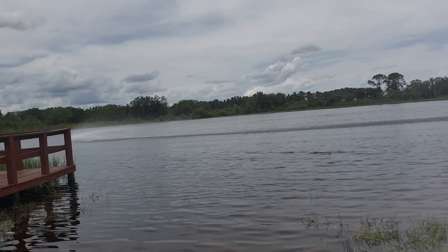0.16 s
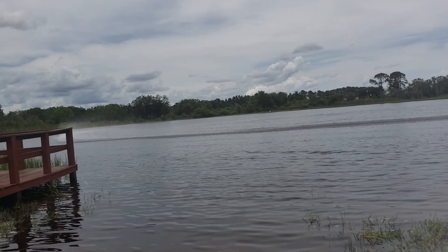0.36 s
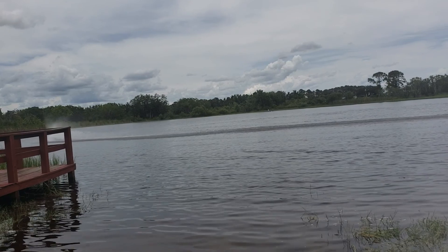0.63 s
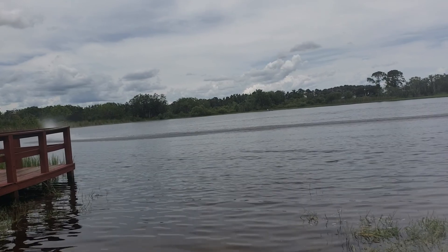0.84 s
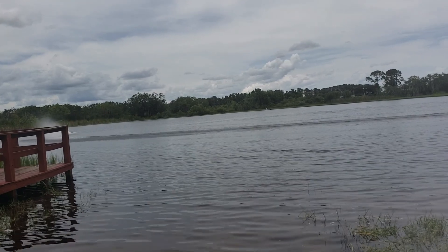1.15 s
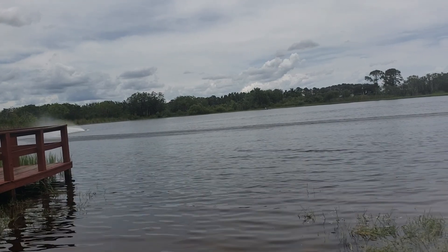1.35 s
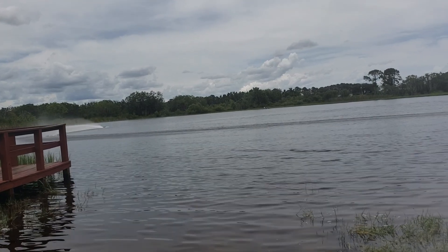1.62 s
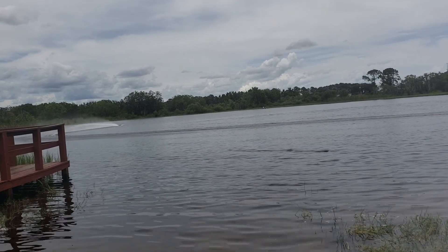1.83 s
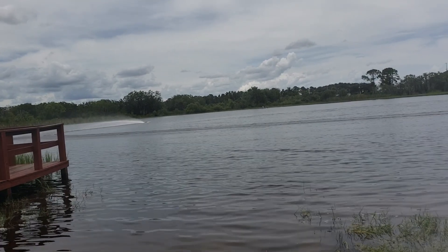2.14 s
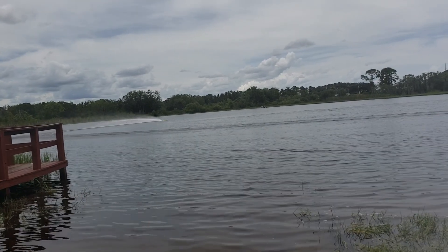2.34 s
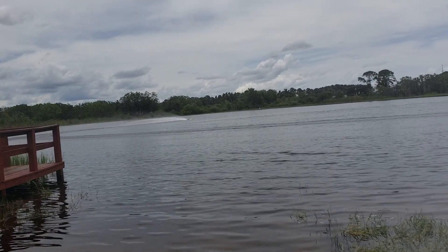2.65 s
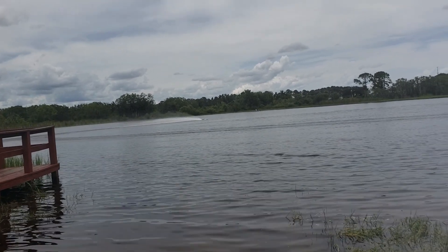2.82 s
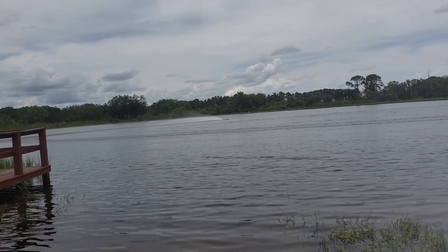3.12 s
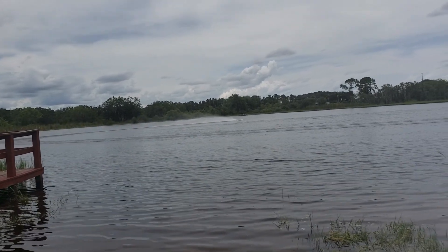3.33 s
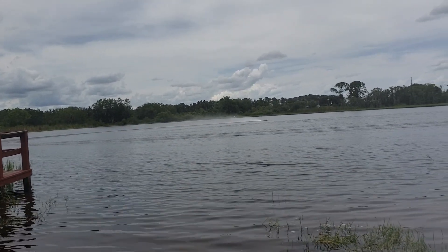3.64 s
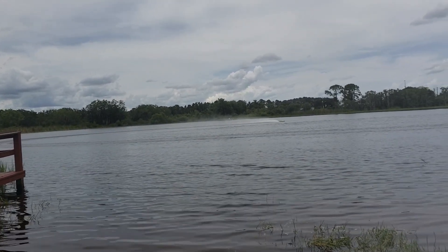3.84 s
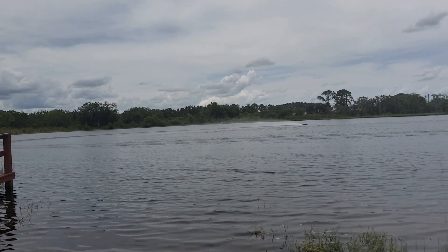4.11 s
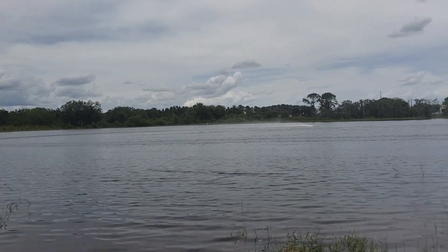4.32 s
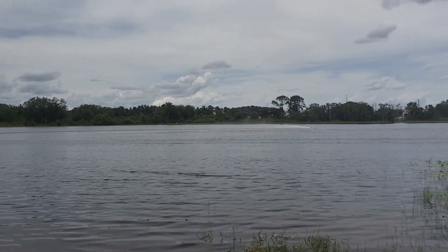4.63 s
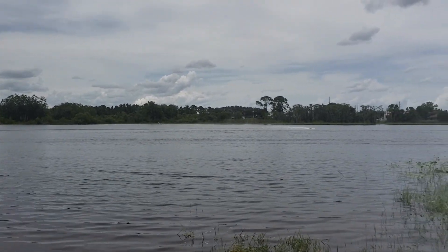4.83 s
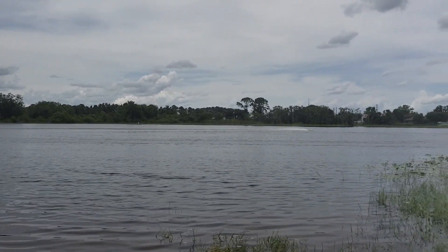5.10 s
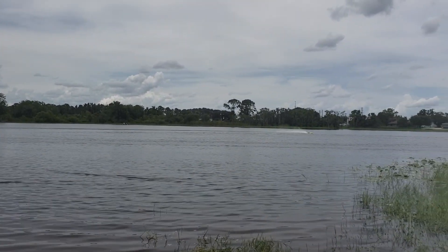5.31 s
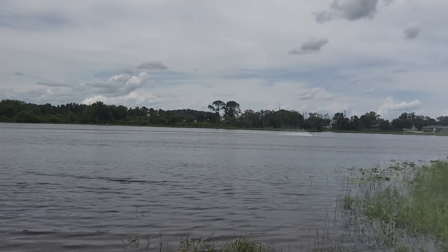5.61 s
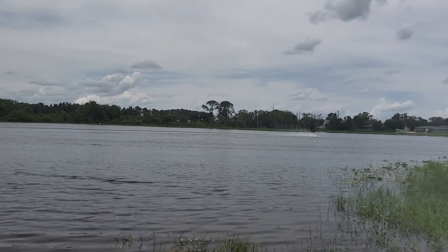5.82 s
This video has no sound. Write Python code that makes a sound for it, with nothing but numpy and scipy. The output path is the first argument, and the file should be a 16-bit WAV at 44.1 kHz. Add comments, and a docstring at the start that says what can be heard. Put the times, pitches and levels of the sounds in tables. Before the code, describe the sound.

Outdoors by a lake, a distant model boat with a small two-stroke engine whines high and steady, its tone shifting as it turns and passes behind a wooden jetty. Spray and light breeze hiss underneath. Hull slaps come midway, then after about four and a half seconds the pitch falls in steps, sputtering, and steadies lower. Stereo microphone on the shore, engine far off.

```python
"""Model boat on a lake

A small two-stroke model boat races across a lake, far from two microphone ports; a breeze blows.
Each firing is a sharp pulse, built from overtones of the firing rate and bursts of gas noise.
Overtones swell and fade as the hull turns, passes behind a jetty and throttles back.
Spray is filtered noise, wave slaps are short thumps with a splash, a distant motor is one climbing
tone, and an insect in the reeds ticks on two high tones."""
import sys
import numpy as np
from scipy import signal
from scipy.fft import rfft, irfft, next_fast_len
from scipy.io import wavfile
from scipy.ndimage import uniform_filter1d, map_coordinates

SR = 44100
rng = np.random.default_rng(int(sys.argv[2]) if len(sys.argv) > 2 else 0)


def pcm_store(signal):
    """Save signal as 16-bit PCM."""
    levels = np.round(np.clip(np.atleast_2d(signal), -1, 1) * 32767)
    wavfile.write(sys.argv[1], SR, levels.astype(np.int16).T)


N = 262836  # length in samples
TOP_HZ = 15830  # nothing is heard above this
PIPE_LAG = 1.1  # lag in radians far below the pipe's resonance
HALVES = np.array([[.5], [-.5]])  # shares a left-right difference between the ports

# Water and air before their random surges: start_s, spray_db, breeze_db
WASH = [(0, -42, -46), (.5, -48.5, -45), (1.1, -58, -44), (1.6, -46.5, -44), (2.1, -45, -42.5),
        (2.7, -44.5, -43.5), (3, -41, -38), (3.6, -40, -41), (4.3, -44, -40.5), (4.6, -41, -39.5),
        (4.9, -49, -43), (5.3, -47, -41.5), (5.45, -45, -41.5), (5.96, -52, -40.5)]
# Single overtones swell or fade for a moment: order (multiple of the firing rate), middle_s,
# change_db, half_length_s
SWELLS = [(12, 0.043, 15, .1), (10, .04, 3.5, .09), (10, .15, -8, .02), (10, 0.21, 3.5, .03),
          (13, .04, 5, .08), (14, .04, -9, .08), (16, .08, 13, .15), (7, 0.79, -9, .07), (5, .8, 6, 0.066),
          (13, 1.25, 9, 0.088), (14, 4.42, 10, .07), (7, 0.98, -10, .03), (8, 0.8, -10, .02),
          (8, 0.88, 6, .05), (8, .97, -8, 0.023), (10, 0.89, -8, .05), (7, 1.1, -8, .02),
          (4, 1.35, -8, .02), (10, 1.04, 9, 0.048), (8, 1.09, 7.5, 0.088), (3, 1.29, 4.5, 0.05),
          (3, 4.1, 3, 0.03), (3, 4.07, 5.5, 0.017), (3, 4.31, 7.5, .016), (4, 4.31, 5, .02),
          (3, 4.43, 2, 0.018), (4, 3.8, 6, .012), (13, 4.42, -7, .06), (7, 0.46, 5, 0.17),
          (3, 1.18, -12, 0.037), (4, 1.08, -6, 0.1), (8, 1.47, 11.5, 0.22), (6, 1.61, -11.5, 0.18),
          (6, 2.08, 3, 0.15), (6, 2.22, -4, 0.063), (9, 2.4, 5.5, 0.087), (4, 2.64, -4, 0.098),
          (8, 2.93, -5.5, 0.26), (5, 3.05, 2, 0.05), (4, 3.27, -9, 0.25), (4, 3.5, 3.5, 0.3),
          (5, 4.08, -11, 0.074), (3, 4.2, -9, 0.042), (5, 4.42, 10, 0.12), (5, 4.6, 4, 0.067),
          (4, 4.7, 7, 0.097), (13, 4.53, -6, 0.03), (7, 4.65, 9.5, 0.18), (12, 4.95, 6.5, 0.077),
          (13, 1.9, 2, 0.47), (8, 4.57, 11, 0.046), (10, 4.57, -16, 0.038), (11, 4.58, 6.5, 0.046),
          (10, 5.8, 2, 0.041), (11, 4.82, 8, 0.057), (5, 4.8, 10, 0.039), (12, 4.81, -15, 0.039),
          (11, 0.99, 12, .25), (14, 1.97, -9, 0.69), (15, 1, 3.5, 1), (16, 1.4, -6, 0.25),
          (15, 2.25, -6, .25), (16, 2.3, 8, .35), (17, 2.2, 9, 0.52), (16, 4.2, -10, .25),
          (15, 4.57, 11, 0.062), (16, 5.4, 5, 0.058), (15, 5.1, 4, .06), (17, 4.69, 10, .06),
          (6, 5.48, 4, 0.14), (12, 5.56, 5.5, 0.17), (8, 5.68, 2.5, 0.22), (5, 5.85, 11.5, 0.18),
          (4, 5.95, 7, 0.067)]


def amp(db):
    """Turn decibels into a plain factor."""
    return 10 ** (np.asarray(db) / 20)


def unit(x):
    """Scale a sound to rms 1."""
    return x / np.sqrt(np.mean(x ** 2) + 1e-20)


def along(points, hz):
    """Read a curve of (Hz, value) points on a log frequency axis."""
    f, v = np.transpose(points)
    return np.interp(np.log(hz + 1), np.log(f + 1), v)


def curves(rows):
    """One value per sample for each column after the time."""
    s, *cols = np.transpose(rows)
    return [np.interp(np.arange(N) / SR, s, c) for c in cols]


def bumps(rows):
    """A sum of smooth bumps: middle in s, height, half length in s."""
    return sum(height * np.exp(-((np.arange(N) / SR - s) / half) ** 2) for s, height, half in rows)


def swells_of(swells, k):
    """The level change in dB of overtone k."""
    return bumps([row for order, *row in swells if round(order) == k])


def wobble(rate):
    """A random curve of straight pieces, with rate knots a second."""
    knots = rng.standard_normal(int(N * rate / SR) + 4)
    return np.interp(np.arange(N) * rate / SR, np.arange(len(knots)), knots)


def filtered(x, response):
    """Shape x by a response, possibly complex, at each frequency."""
    m = next_fast_len(N + 8192)
    return irfft(rfft(x, m) * response(np.fft.rfftfreq(m, 1 / SR)), m)[..., :N]


def hiss(spectrum, alike):
    """Stereo noise of rms 1; alike sets how similar left and right are at each frequency."""
    def response(hz):
        turn = np.arccos(np.clip(along(alike, hz), -1, 1)) / 2
        return amp(along(spectrum, hz)) * [np.cos(turn), np.sin(turn)]

    mid, side = filtered(rng.standard_normal((2, N)), response)
    return unit(np.array([mid + side, mid - side]))


def from_boat(spectrum, lead_ms, alike):
    """Noise from the boat that reaches one port before the other."""
    pair = hiss(spectrum, alike)
    at = np.arange(N) + lead_ms / 1000 * SR * HALVES
    return np.array([map_coordinates(x, [i], mode="nearest") for x, i in zip(pair, at)])


def overtones(turns, rate, spectrum, orders, spread, fade_db, fade_rate, lift_db=np.zeros(N),
              lift_hz=4100, over_hz=0, swells=(), lag=0):
    """Some orders of a pulse train, each fading and drifting alone; rms 1 above over_hz before swells."""
    out, power = np.zeros((2, N)), 1e-12
    for k in orders:
        hz = k * rate[::64]  # levels are updated every 64 samples
        lift = lift_db[::64] * np.clip((hz - lift_hz) / 700, 0, 1)
        gain = amp(along(spectrum, hz) + fade_db * wobble(fade_rate)[::64] + lift) * (hz < TOP_HZ)
        power = power + gain ** 2 / 2 * np.clip((hz - over_hz) / 200, 0, 1)
        tone = np.sin(2 * np.pi * k * turns - lag + spread * wobble(fade_rate))
        out -= amp(swells_of(swells, k)) * np.repeat(gain, 64)[:N] * tone
    return out / np.repeat(np.sqrt(power), 64)[:N]


def shaft(lead_ms, scatter_db):
    """The engine fires once a turn; its turns are counted as each port hears them."""
    # Firing rate before skips and hunting: start_s, rate_hz
    firing = [(0, 272.5), (.17, 268.2), (.46, 262.8), (1.3, 262.1), (2.38, 267.1), (3, 272.4), (3.2, 269.9),
              (3.46, 266.6), (3.61, 267.3), (3.77, 270.6), (4.1, 279.5), (4.26, 272), (4.4, 267.1),
              (4.507, 264.7), (4.52, 251), (4.55, 241.8), (4.62, 238.5), (4.65, 219.4), (4.756, 219.4),
              (4.79, 200.6), (4.848, 198.5), (4.886, 185.3), (5.03, 175.8), (5.22, 183), (5.32, 174.7),
              (5.4, 194.7), (5.49, 198.1), (5.96, 195.9)]
    # The propeller skips out of a wave and the engine races for a moment: middle_s, rise_hz
    skips = [(3.531, 5.55), (3.674, 5.2), (3.881, 3.1), (4.32, 9), (4.467, 8.35), (4.721, 4.07),
             (5.71, 3.4), (5.847, 5.5)]
    skip_half_s = .03
    steady_rate = curves(firing)[0] + bumps([(s, hz, skip_half_s) for s, hz in skips])
    # uneven firing makes the speed hunt
    rate = steady_rate * (1 + 0.001 * scatter_db ** 2 * wobble(30))
    turns = np.cumsum(rate) / SR + rate * lead_ms / 1000 * HALVES
    return steady_rate, rate, turns


def firings(turns, scatter_db):
    """Every combustion has its own strength, and some misfire."""
    # Missed firings: middle_s, dip_db, half_length_s
    stumbles = [(4.517, -5, 0.007), (4.552, -7, 0.008), (4.643, -4.5, 0.01), (4.785, -3, .008),
                (4.862, -5, 0.0079), (4.925, -7, .006)]
    # Four-stroking, every second firing fails; dips before alternation: middle_s, dip_db, half_length_s
    four_stroking = [(4.8, -6, .012), (4.935, -6, .01), (5.014, -16, .018), (5.085, -14, .022),
                     (5.24, -14, .012), (5.265, -8, .008), (5.296, -14, .018), (5.342, -12, .007)]
    strengths = rng.standard_normal((2, 2000))
    # a strong firing leaves a poor charge for the next
    strengths = np.clip(strengths - .75 * np.roll(strengths, 1, axis=1), -3, 1.1)
    push, snap = (map_coordinates(row, [turns[0] + 1], order=1) for row in strengths)
    # the firing after a miss is the stronger
    alternation = (.7 - np.cos(np.pi * turns)) / 2
    miss_db = bumps(stumbles) + bumps(four_stroking) * alternation
    return scatter_db * push, miss_db, snap


def order_levels(rate):
    """The colour turns with the hull and changes when the engine falls off the pipe or labours."""
    # Course of the hull: start_s, level_db, dulling_db_per_octave, heading (0-2; more counts as 2)
    hull = [(0, 0.5, -0.5, 0.18), (.3, -2, -2, 0.39), (.65, 0.5, 0.4, 0.28), (.9, 3, 4, 0.46),
            (1.12, -1, 2.5, 0.71), (1.3, -0.5, 2.5, 0.91), (1.45, -0.5, 0.7, 1.15), (1.7, 2.5, -0.26, 0.77),
            (1.95, 2.9, -0.23, .6), (2.3, 0.7, -0.27, 0.65), (2.55, 2, 0.4, 1.11), (2.8, 4.5, 2, 1.24),
            (3.05, 3, -0.87, 1.48), (3.4, 2, -1.84, 1.87), (3.6, 2.5, -1.5, 1.66), (3.9, 1.9, -1.04, 1.66),
            (4.15, 0.8, -0.76, 1.6), (4.45, 1.5, -0.35, 1.95), (4.65, 4, 2, 2.8), (4.8, 3, 3, 1.9),
            (4.92, -1, 1.5, 2.2), (5.05, 0, 1.5, 2), (5.2, 1.5, 1.3, 1.9), (5.45, 2.5, 1.43, 1.9),
            (5.96, 7, 3, 2)]
    # Strong orders on the pipe for three headings: order (multiple), first_db, second_db, third_db
    on_pipe = [(1, -36, -32.5, -33.5), (2, -39, -37, -53), (3, -40.5, -32, -38), (4, -21, -32, -41),
               (5, -37.5, -39, -43.5), (6, -38.5, -31, -36), (7, -38.5, -35, -50.5), (8, -35.5, -37.5, -40),
               (9, -54, -37, -47), (10, -38.5, -32.5, -46), (11, -51, -50, -47.5),
               (12, -44.5, -54.5, -48.5), (13, -49, -40, -44)]
    # Their colour once the engine has fallen off the pipe: pitch_hz, level_db
    off_pipe = [(180, -54), (240, -38), (390, -42), (480, -52.5), (600, -78), (780, -44.5), (900, -43.5),
                (1000, -46.5), (1200, -41), (1400, -46), (1600, -36), (1900, -46.5), (2200, -39.5),
                (2700, -42), (3200, -59)]
    # Their colour at the lowest speed: pitch_hz, level_db
    labouring = [(180, -53.5), (360, -43), (560, -60), (750, -48.5), (1050, -41.5), (1350, -40),
                 (1800, -40), (1970, -53), (2170, -39), (2400, -45)]
    on_pipe_hz, off_pipe_hz, labours_hz = 254, 243, 186  # firing rates
    level_db, dull_db, heading = curves(hull)
    off = np.clip((on_pipe_hz - rate) / (on_pipe_hz - off_pipe_hz), 0, 1)
    labour = np.clip((labours_hz - rate) / 5 + 1, 0, 1)
    for k, *by_heading in on_pipe:
        k = round(k)
        on_db = np.interp(heading, range(3), by_heading)
        off_db = (1 - labour) * along(off_pipe, k * rate) + labour * along(labouring, k * rate)
        colour_db = (1 - off) * on_db + off * off_db
        yield k, colour_db + level_db - dull_db * np.log2(k) + swells_of(SWELLS, k)


def low_orders(steady_rate, rate, turns, scatter, miss_db, spread, rings):
    """The strongest overtones of the pulses; the pipe evens out the lowest orders."""
    rasp_db, rasp_rad = 1.5, .42  # quick flutter of level and phase
    jetty_s, jetty_half_s, jetty_db = 1.15, .3, 2.5
    pipe_hz, pipe_width_hz = 1500, 380
    # the posts make each order flicker more as the boat passes behind
    flicker_db = 0.92 + bumps([(jetty_s, jetty_db, jetty_half_s)])
    out = np.zeros((2, N))
    for k, db in order_levels(steady_rate):
        uneven = min(k / 7, 1)
        change_db = scatter + miss_db + flicker_db * wobble(16) + rasp_db * wobble(45)
        # every order wavers a little on its way across the lake
        level = amp(db + uneven * change_db + .8 * wobble(21.97))
        pipe_lag = PIPE_LAG + np.pi / 2 + np.arctan((k * rate - pipe_hz) / pipe_width_hz)
        phase = 2 * np.pi * k * turns + 3 / k ** 2 - rings * pipe_lag
        drift = spread * wobble(3.628) + uneven * rasp_rad * (1 - rings) * wobble(60)
        out -= np.sqrt(2) * level * np.sin(phase + drift)
    return out


def exhaust_bark(turns, rate, spread, rings):
    """The tuned exhaust pipe colours the middle overtones."""
    # Tuned pipe: pitch_hz, relative_level_db
    pipe_colour = [(1800, -2.5), (2400, -2), (2750, 4.5), (3060, -17), (3400, -3), (3620, -1), (3800, -7),
                   (4200, -11), (4500, -17), (4850, -18.5), (5200, -13.5), (5800, -53)]
    # The pipe's top resonance turns towards the shore: start_s, lift_db
    ring_lift = [(0, 2.5), (.9, -19), (2, -11), (2.6, 7.5), (3.4, 0), (4.4, 11.5), (5.1, -6), (5.96, 10)]
    return overtones(turns, rate, pipe_colour, range(14, 32), spread, fade_db=2.2, fade_rate=20,
                     lift_db=curves(ring_lift)[0], over_hz=2750, swells=SWELLS,
                     lag=(PIPE_LAG + np.pi) * rings)


def outlet_crack(turns, rate, spread, lead_ms, gate):
    """The edge of the outlet gives sharp high overtones and a puff of gas noise at each firing."""
    # Outlet edge: pitch_hz, relative_level_db
    edge_colour = [(4600, -83), (5600, -8.5), (6800, -7), (7900, 1), (9300, -6), (11200, -6.5),
                   (12000, -27), (13000, -33), (16000, -48)]
    # Lift of the crack's upper band: start_s, lift_db
    edge_top = [(0, 3), (.6, -4), (1, -12), (1.33, 10), (1.5, 4), (2.1, -2), (2.5, 2), (3, -4), (3.55, 4.5),
                (3.8, 0.5), (4.2, 1.5), (5, -5), (5.3, -4), (5.4, 2), (5.96, -3)]
    tones = overtones(turns, rate, edge_colour, range(20, 68), .6 + .25 * spread, fade_db=2.5,
                      fade_rate=10, lift_db=curves(edge_top)[0], lift_hz=9200)
    puffs = unit(gate * from_boat(edge_colour, lead_ms, [(5000, 0.16)]))
    noise_share = .07  # of the power
    return np.sqrt(1 - noise_share) * tones + np.sqrt(noise_share) * puffs


def jet_sizzle(turns, rate, lead_ms, gate):
    """The top of the exhaust jet: pulsing, flickering noise mixed with the highest overtones."""
    # Top of the exhaust jet: pitch_hz, relative_level_db
    jet_colour = [(9000, -17), (11800, -0.5), (13000, 3), (15000, -0.5), (16000, -21)]
    noise = from_boat(jet_colour, lead_ms, [(5000, 0.067)])
    noise = unit((1.0 + gate) * amp(2.5 * wobble(51)) * noise)
    tones = overtones(turns, rate, jet_colour, range(42, 88), 1.1, fade_db=3, fade_rate=20)
    return .75 * noise + .65 * tones


def spray(lead_ms, gate):
    """Hissing water that thickens with each push of the propeller."""
    # Colour of the spray: pitch_hz, relative_level_db
    spray_colour = [(100, -51), (250, 3.5), (420, -21), (640, -8), (900, 0), (1400, -5.5), (2200, -2),
                    (2700, -2), (3200, -7), (4000, -16), (5000, -29), (8000, -23), (16000, -42)]
    surge_db = 1.2 * wobble(12)
    water = from_boat(spray_colour, lead_ms, [(300, 0.99), (1500, 0.52), (4000, 0.11)])
    return amp(curves(WASH)[0] + surge_db) * water * (.9 + .7 * gate)


def boat():
    """Engine pulses and spray share the turns of one shaft and the bearing of one hull."""
    # Bearing of the boat: start_s, left_port_leads_ms, left_minus_right_db
    bearing = [(0, .06, -.9), (.5, .095, -.9), (.95, .12, -.3), (1.35, .1, -.5), (1.75, .08, -.5),
               (2.15, .055, 0), (2.55, .033, 0), (2.95, 0, .2), (3.35, -.03, .3), (3.75, -.057, .4),
               (4.15, -.085, .3), (4.55, -.11, .4), (5.35, -.12, .7), (5.96, -.15, .5)]
    # Combustion: start_s, firing_scatter_db (per unit of strength), pulse_spread_radians
    burn = [(0, 1.2, .8), (.4, 1, 1.2), (1.1, 1.1, 1.6), (2.6, .9, 1.2), (3.05, 1.1, .65), (4.3, 1.2, .7),
            (4.6, 1.8, .5), (4.9, 2.1, .25), (5, 1.5, .2), (5.33, 1.6, .2), (5.42, 1.6, .7),
            (5.96, 1.5, .8)]
    # Exhaust outlet facing the shore; bark is later smoothed and cut by 6 dB:
    # start_s, bark_db, crack_db, sizzle_db
    outlet = [(0, -29, -28, -28), (.2, -39, -44.5, -46), (.4, -32, -48.5, -57), (.81, -42.5, -58.5, -61),
              (1.23, -36, -49, -55), (1.33, -33, -38, -48), (1.49, -37, -40, -55),
              (1.59, -29, -37.5, -40.5), (1.66, -38, -39.5, -46), (1.76, -34, -35, -38),
              (1.87, -40, -43.5, -46), (2.07, -26, -38, -44), (2.12, -36, -42.5, -48),
              (2.17, -39, -38.5, -49), (2.22, -35, -41.5, -45), (2.51, -30, -37.5, -47),
              (2.6, -39, -53, -50.5), (2.89, -36, -55.5, -51), (2.99, -34, -39, -47), (3.04, -32, -43, -48),
              (3.14, -28.5, -36, -43), (3.24, -33, -41.5, -53), (3.4, -30, -44, -58),
              (3.49, -31.5, -35, -48), (3.53, -27, -38, -52), (3.57, -31.5, -33.5, -46),
              (3.7, -35, -42, -56), (3.79, -33.5, -35.5, -52), (3.9, -39, -41.5, -56), (4.1, -41, -38, -47),
              (4.32, -41.5, -41, -51), (4.55, -45, -50, -68), (4.675, -38, -40.5, -56),
              (4.72, -43, -47.5, -66), (4.91, -52, -60.5, -65), (5.06, -41.5, -45.5, -59),
              (5.54, -37.5, -49, -61), (5.75, -39, -52.5, -62), (5.96, -38, -47, -55)]
    # Off the throttle each pulse starts sharply and the pipe rings after it: start_s, share (0-1)
    ringing = [(4.35, 0), (4.48, .6), (4.9, .85), (5.4, .85), (5.5, .4)]
    lead_ms, pan_db = curves(bearing)
    scatter_db, spread = curves(burn)
    bark_db, crack_db, sizzle_db = curves(outlet)
    rings = curves(ringing)[0]
    steady_rate, rate, turns = shaft(lead_ms, scatter_db)
    scatter, miss_db, snap = firings(turns, scatter_db)
    gate = ((1 + np.cos(2 * np.pi * turns)) / 2) ** 3  # opens once a firing

    low = low_orders(steady_rate, rate, turns, scatter, miss_db, spread, rings)
    bark_db = uniform_filter1d(bark_db, size=2200) - 6.0
    bark = amp(scatter + miss_db + bark_db) * exhaust_bark(turns, rate, spread, rings)
    crack = amp(crack_db) * outlet_crack(turns, rate, spread, lead_ms, gate)
    sizzle = amp(sizzle_db) * jet_sizzle(turns, rate, lead_ms, gate)
    treble = amp(scatter + miss_db + 0.71 * snap + 1.86 * wobble(14)) * (crack + sizzle)
    return (low + bark + treble + spray(lead_ms, gate)) * amp(pan_db * HALVES)


def breeze():
    """Breeze and far traffic: soft noise with a slowly wavering level."""
    # Colour of the air: pitch_hz, relative_level_db
    air_colour = [(20, -26), (50, -9), (110, -2), (200, -6), (400, -8.5), (630, -14), (1000, -11),
                  (3000, -18.5), (5500, -30), (12000, -31.5), (16000, -46)]
    # Left-right likeness of the air: pitch_hz, likeness (0-1)
    air_alike = [(30, .85), (80, .95), (300, .96), (1000, .85), (3000, .6), (16000, .5)]
    air = amp(curves(WASH)[1] + 1.5 * wobble(3.33)) * hiss(air_colour, air_alike)
    return air * amp([[-.7], [.7]])  # a little stronger on the right


def motor():
    """A far motor climbs in pitch, then drops back: one low tone of wavering level."""
    # Far motor before its wavering: start_s, pitch_hz, rms_level_db
    motor_run = [(.05, 47.5, -69), (.3, 56.3, -48), (.6, 62, -51), (.75, 70.4, -59), (1.05, 80.45, -47),
                 (1.45, 89.4, -54), (1.8, 100.1, -56), (2.15, 111, -44.5), (2.45, 122.5, -45),
                 (2.7, 114.5, -60), (2.9, 111, -74)]
    hz, db = curves(motor_run)
    return np.sqrt(2) * amp(db + 0.89 * wobble(8.3)) * np.sin(2 * np.pi * np.cumsum(hz) / SR)


def slaps():
    """Short hollow thumps of the hull on waves, each with a dull splash around its pitch."""
    # Hull on a wave: start_s, level_db, pitch_hz
    wave_hits = [(2.98, -28, 140.3), (3.03, -27, 281), (3.085, -32, 150), (3.125, -34, 150),
                 (3.2, -35, 120), (3.24, -31, 140), (4.06, -30, 760), (4.3, -27, 900), (4.44, -29, 950)]
    out, t = np.zeros(N), np.arange(SR // 5) / SR
    for s, db, hz in wave_hits:
        band = signal.butter(2, [hz * 0.61, hz * 1.9], "band", fs=SR, output="sos")
        splash = unit(signal.sosfilt(band, rng.standard_normal(len(t))))
        # the thump falls 60 dB in 0.095 s, the splash in 0.16 s
        thump = amp(-60 * t / 0.095) * np.sin(2 * np.pi * hz * t)
        hit = thump + amp(-6 - 60 * t / 0.16) * splash
        out[round(s * SR):][:len(t)] += amp(db) * (1 - np.exp(-t / 0.005)) * hit
    return out


def insect():
    """Each tick is two wing clicks and a weaker third, sounding on two high modes."""
    # Insect ticks: start_s, level_db
    ticks = [(4.3367, -54), (4.3976, -47), (4.45, -51), (4.5074, -48), (4.5687, -46), (4.6296, -45),
             (4.679, -42), (4.7363, -48), (4.7905, -45), (4.8425, -51), (4.901, -45), (4.9594, -45.5),
             (5.0222, -52), (5.0777, -51), (5.1456, -51), (5.2012, -47)]
    out, t = np.zeros(N), np.arange(SR // 50) / SR
    for (s, db), (bend, third, lower) in zip(ticks, rng.uniform(-1.1, 1, (len(ticks), 3))):
        wing_beats = [(.001, 0.84), (.0052, 0.88), (.0095, .3 + .3 * third)]  # s, strength
        clicks = sum(g * np.exp(-((t - at) / .0006) ** 2) for at, g in wing_beats)
        upper_mode = np.sin(2 * np.pi * 14300 * (1 + 0.023 * bend) * t)
        lower_mode = (0.66 + .4 * lower) * np.sin(2 * np.pi * 13000 * t)
        out[round(s * SR):][:len(t)] += amp(db) * clicks * (upper_mode + lower_mode)
    return out


def through_ports(x):
    """The body around the ports shades the sound: level and phase differ from left to right."""
    # Phase between the ports: pitch_hz, left_port_leads_radians
    port_turn = [(100, .1), (270, .25), (800, .3), (1050, .95), (1350, 1), (1600, .85), (2150, .8),
                 (2650, .5), (4000, .6), (4600, 2.1), (6000, 3.2), (7000, 3.8), (10500, 3.6), (16000, 5)]
    # Balance of the ports: pitch_hz, left_minus_right_db
    port_balance = [(100, -2.5), (270, -1.5), (530, 3), (800, -1), (1060, 0.5), (1600, 3.5), (2150, 1.5),
                    (3400, -2.5), (8000, 1.5), (14000, 0)]

    def response(hz):
        return amp(along(port_balance, hz) * HALVES) * np.exp(1j * along(port_turn, hz) * HALVES)

    return filtered(x, response)


def scene():
    """Boat, far motor and slaps pass the shading of the ports; air and insect are added directly."""
    return through_ports(boat() + motor() + slaps()) + breeze() + insect()


def record(dry):
    """Keep nothing above the band limit."""
    return filtered(dry, lambda hz: hz < TOP_HZ)


dry = scene()
out = record(dry)
pcm_store(out)
```